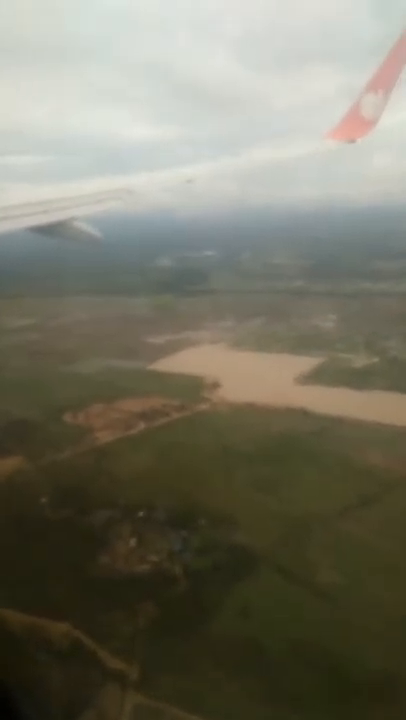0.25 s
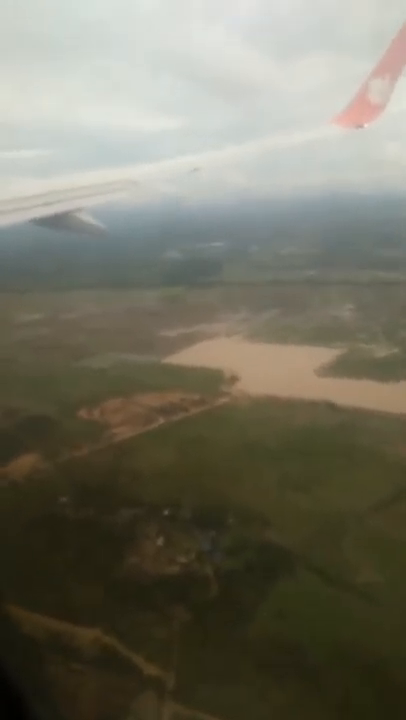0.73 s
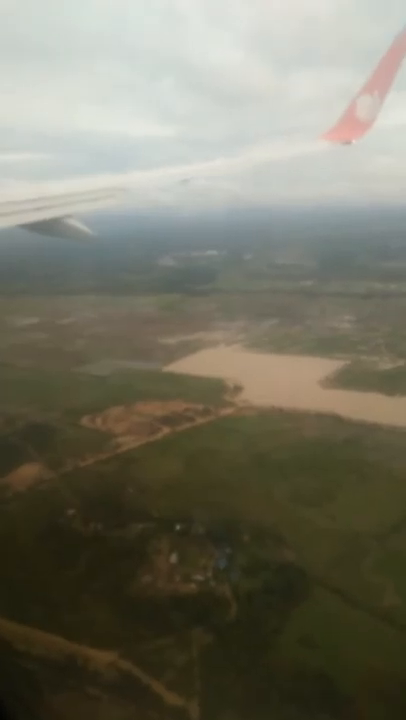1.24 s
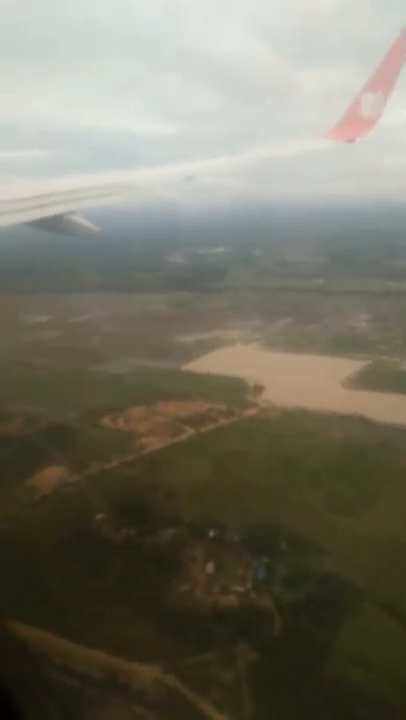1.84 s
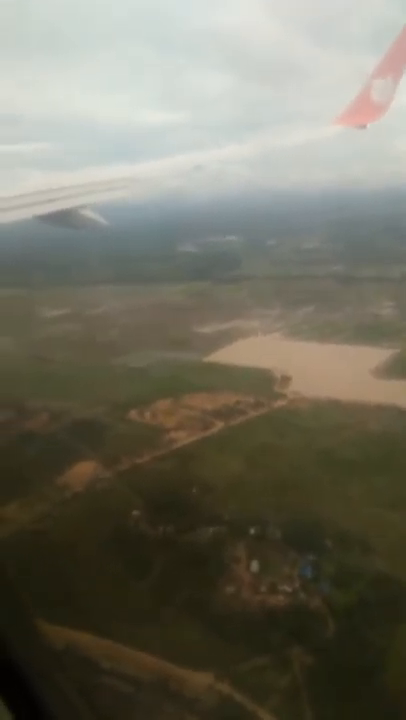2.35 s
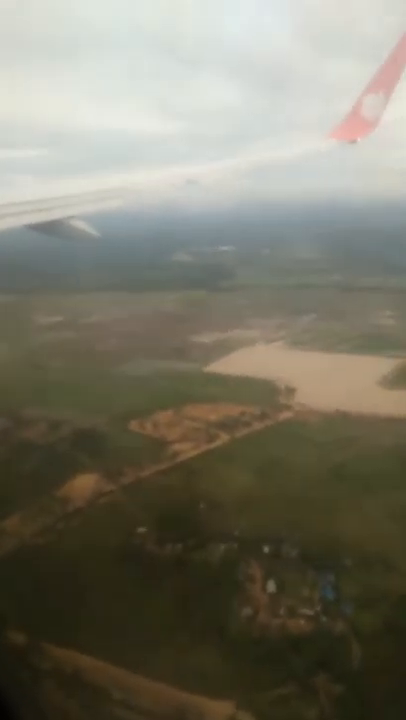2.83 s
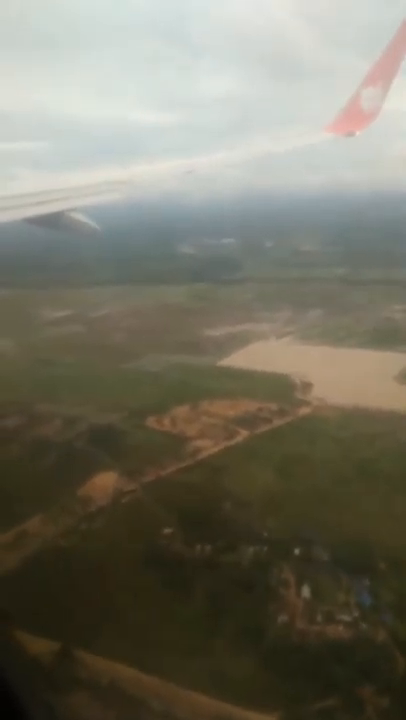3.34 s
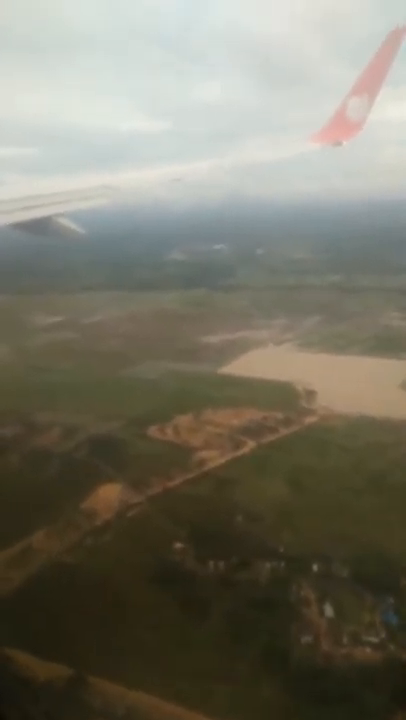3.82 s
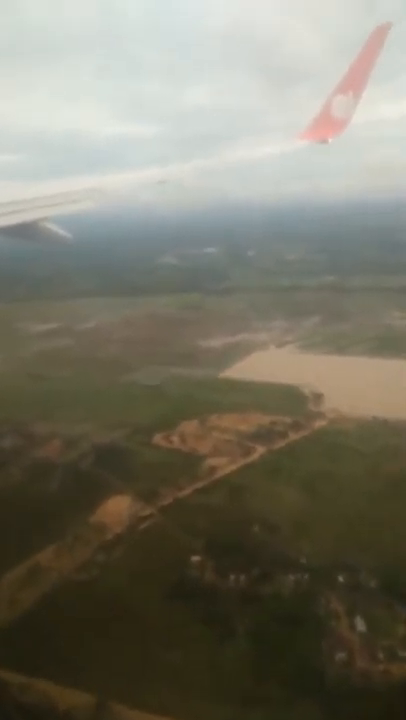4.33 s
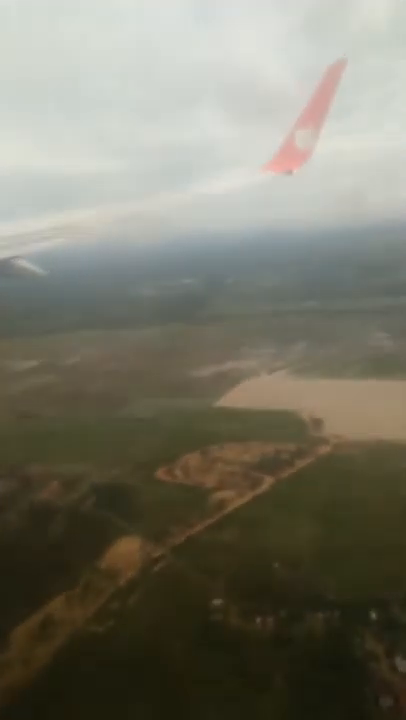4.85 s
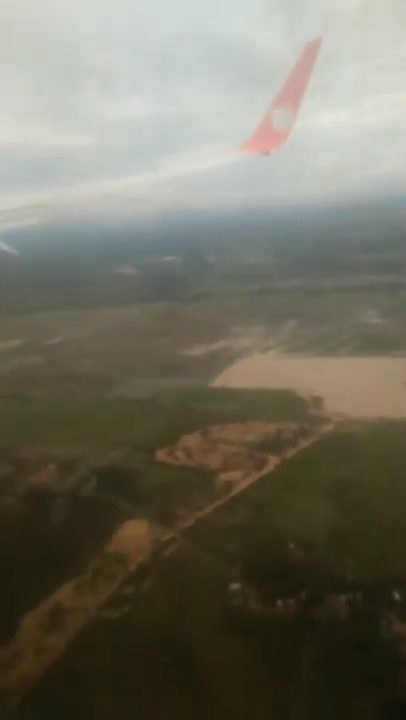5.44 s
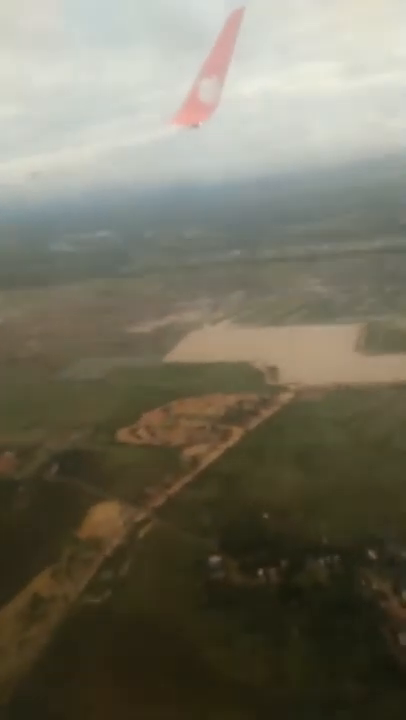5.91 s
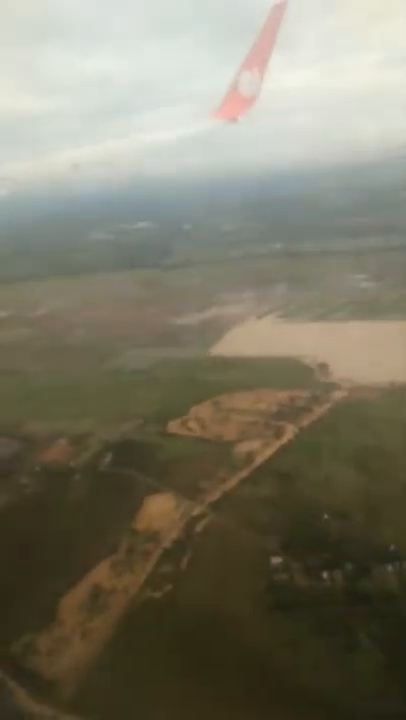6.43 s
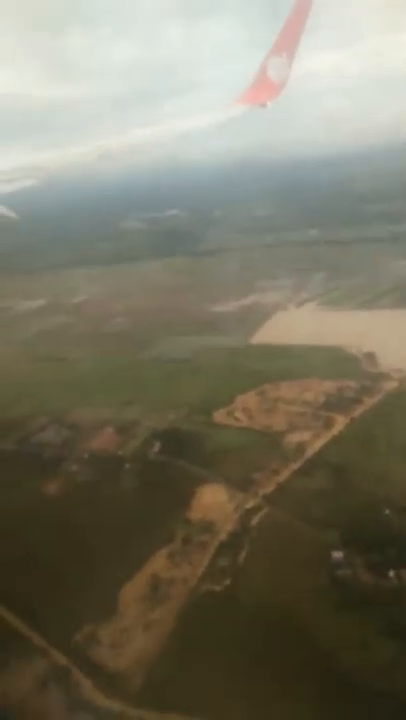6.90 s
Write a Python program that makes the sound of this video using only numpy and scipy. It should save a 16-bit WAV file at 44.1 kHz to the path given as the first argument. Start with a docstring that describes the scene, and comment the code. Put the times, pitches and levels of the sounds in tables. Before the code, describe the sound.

Heard from a window seat in a descending airliner, a deep engine and airflow rumble throbs throughout. Air rushes along the fuselage, with a faint vent hiss and a thin turbine whine above it. Cloth rustles faintly close to the microphone, with tiny ticks. From about two seconds on, loose trim knocks softly now and then. A brief hollow swell comes near six seconds, and the vents whistle slightly more afterward.

```python
"""A window seat in a descending airliner. From the start, engine and slipstream rumble throbs and surges in
the cabin's low resonances, air rushing along the fuselage makes the panels ring, vents hiss under a thin
turbine whine, and cloth rustles faintly close by. Soft scuffs and small ticks join within the first
second, dull knocks of the trim from 1.8 s on. Near 6 s comes a hollow swell; then the vents whistle more."""
import sys
import numpy as np
from scipy import signal
from scipy.fft import rfft, irfft, next_fast_len
from scipy.io import wavfile
from scipy.ndimage import uniform_filter1d, map_coordinates

SR = 44100
rng = np.random.default_rng(int(sys.argv[2]) if len(sys.argv) > 2 else 0)


def to_wav(s):
    """Save 16-bit WAV."""
    ch = np.atleast_2d(s).T  # columns
    pcm = np.round(np.clip(ch, -1, 1) * 32767)  # PCM
    wavfile.write(sys.argv[1], SR, pcm.astype(np.int16))


N = 316197


def amp(db):
    """Decibels to amplitude ratio."""
    return 10 ** (np.asarray(db) / 20)


def unit(x):
    """Normalisation to rms 1."""
    return x / np.sqrt(np.mean(x ** 2) + 1e-20)


def curve(rows):
    """Linear interpolation of (time [s], value) rows to one value per sample."""
    return np.interp(np.arange(N) / SR, *np.transpose(rows))


def swell(middle_s, half_s):
    """A Gaussian envelope of height 1, down to 1/e at half_s from its middle."""
    u = np.linspace(-4, 4, 161)
    return np.interp(np.arange(N) / SR, middle_s + half_s * u, np.exp(-u ** 2))


def wobble(rate):
    """Random modulation: a spline through rate Gaussian knots a second."""
    grid = np.arange(0, N + 16, 16)
    spline = map_coordinates(rng.standard_normal(8192), [grid * rate / SR], mode="wrap")
    return np.interp(np.arange(N), grid, spline)


def filtered(x, response):
    """Linear filtering: the spectrum of x times a frequency response."""
    size = next_fast_len(len(x) + SR // 4, real=True)
    return irfft(rfft(x, size) * response(np.fft.rfftfreq(size, 1 / SR)), size)[:len(x)]


def tint(x, spectrum):
    """Spectral shaping of x by (frequency [Hz], gain [dB]) points, at rms 1."""
    points_hz, db = np.transpose(spectrum)
    return unit(filtered(x, lambda hz: amp(np.interp(np.log(hz + 1), np.log(points_hz), db))))


def resonant(modes):
    """Random excitation of steep-sided resonances whose powers add, at rms 1."""
    def power(hz):
        return sum(amp(db) ** 2 / (1 + ((hz - centre) / width) ** 2) ** 3 for centre, width, db in modes)
    return unit(filtered(rng.standard_normal(N), lambda hz: np.sqrt(power(hz))))


def steadied(x, seconds):
    """Division by the running rms evens out slow swells and keeps the fast flutter."""
    power = np.abs(uniform_filter1d(x ** 2, int(seconds * SR)))
    return unit(x / np.sqrt(power + 1e-9))


def patchy(x, depth_db):
    """Random modulation of patches a few hundred hertz wide and a few hundredths of a second long."""
    spectra = signal.stft(x, nperseg=1024)[2]
    field = uniform_filter1d(rng.standard_normal(spectra.shape), size=5, axis=0)
    field = uniform_filter1d(field, size=5, axis=1)
    return unit(signal.istft(spectra * amp(depth_db * unit(field)), nperseg=1024)[1][:N])


def singing(hz, width_hz):
    """Narrow-band noise of a flow-driven resonance: amplitude and phase wander at random."""
    phase = 2 * np.pi * hz * np.arange(N) / SR
    return wobble(width_hz) * np.sin(phase) + wobble(width_hz) * np.cos(phase)


def grains(per_s, spread_db):
    """Shot noise: impulses at random moments, of random sign and log-normal size."""
    impulses = (rng.random(N) < per_s / SR) * np.sign(rng.standard_normal(N))
    return impulses * amp(spread_db * rng.standard_normal(N))


def rumble():
    """Forced vibration: turbulence drives hull and cabin air modes; the throb briefly swells and dips."""
    # deep modes of the fuselage: (frequency [Hz], width [Hz], relative level [dB])
    hull_modes = [(52, 13, -3), (70.6, 26.5, -7.5), (102, 36.5, -11)]
    # droning modes of the cabin air: (frequency [Hz], width [Hz], relative level [dB])
    air_modes = [(150.8, 22.8, -2), (186.4, 37, 0), (196.6, 18, -4)]
    # hollow modes above the drone: (frequency [Hz], width [Hz], relative level [dB])
    boom_modes = [(264, 34, -7), (287.2, 35.6, 1.5), (314, 53, -5.5)]
    # slow drift: (time [s], hull level [dB], drone level [dB], boom level [dB])
    levels = [(0, -34, -34, -42), (.8, -30, -33, -44), (1.4, -30, -32, -37), (2.05, -32.5, -30.5, -39),
              (2.7, -30.5, -30, -39), (3.55, -31, -31, -41), (4.35, -30.5, -32, -40),
              (5.45, -30.5, -31, -37), (6.0, -34, -33, -38), (6.7, -34, -31.5, -38.5),
              (7.17, -33, -33.5, -36.5)]
    # brief swells and dips of the rumble: (time [s], half length [s], hull gain [dB], drone gain [dB])
    rumble_swells = [(0.096, 0.021, -2, -10), (0.26, 0.018, 9, 19), (0.388, 0.034, -2, 5.5),
                     (0.592, 0.035, -4, -19), (0.703, .04, -2.5, 1), (1.045, 0.031, 3, -12),
                     (1.226, 0.013, 2.5, -6.5), (1.306, .02, -2.5, -13), (1.359, .022, 5, 5.5),
                     (1.476, 0.019, -6, -5), (1.59, 0.062, 3.5, 3.5), (1.739, 0.019, -6, -10),
                     (1.933, .03, 10, -7), (2.053, 0.022, 7, 3.5), (2.215, .025, 4, 1.5),
                     (2.26, 0.025, 5.5, 0), (2.358, .035, -5.5, -7), (2.652, 0.024, 1, 1),
                     (2.695, 0.021, 2, 6.5), (2.769, 0.024, 5.5, 2.5), (2.924, .03, 8, -11),
                     (3.016, 0.062, -2.5, -5.5), (3.133, 0.017, -1, 8), (3.258, 0.023, 7, 6),
                     (3.345, 0.017, 2, 5.5), (3.459, 0.058, -4, 7), (3.568, .035, -5.5, 0),
                     (3.691, 0.026, -1.5, 3.5), (3.761, .03, -0.5, 5.5), (3.89, 0.04, 5, -1.5),
                     (3.989, .03, -10.5, 7.5), (4.305, 0.038, 4.5, -3), (4.428, 0.023, 3, 4.5),
                     (4.521, 0.028, 1, 10), (4.569, 0.025, 5, 4.5), (4.66, .035, 5.5, 0),
                     (4.809, 0.016, -9, 7.5), (4.983, .04, 3, 3.5), (5.168, 0.034, 5.5, 3),
                     (5.228, 0.036, -6.5, -9), (5.411, .04, 3, -9), (5.81, 0.038, 12.5, -0.5),
                     (5.959, 0.031, 4.5, 8.5), (6.02, .03, -5, -1), (6.258, 0.046, 1, 10.5),
                     (6.317, 0.027, 8.5, -5), (6.454, 0.028, 9, -4), (6.603, 0.036, 2, 4.5),
                     (6.679, 0.049, 8.5, 0), (6.796, 0.015, -9, 12)]
    hull_db, drone_db, boom_db = (curve(np.array(levels)[:, [0, k]]) for k in range(1, 4))
    hull_lift = sum(db * swell(s, half) for s, half, db, _ in rumble_swells)
    air_lift = sum(db * swell(s, half) for s, half, _, db in rumble_swells)
    hull = amp(hull_db + hull_lift + 1.5 * wobble(13)) * steadied(resonant(hull_modes), seconds=.08)
    drone = amp(drone_db + air_lift + 1.9 * wobble(17)) * steadied(resonant(air_modes), seconds=.06)
    boom = amp(boom_db + .3 * air_lift + 2.4 * wobble(13)) * steadied(resonant(boom_modes), seconds=.2)
    return hull + drone + boom


def panel_roar():
    """Plate resonance: the slipstream drives wall and window panels; now and then one rings out."""
    # wall panel modes: (frequency [Hz], width [Hz], relative level [dB])
    wall_modes = [(400.4, 44, 4), (475.2, 34, -2.5), (548, 35, -10)]
    # roar in the walls: (time [s], level [dB])
    wall_levels = [(0, -46), (.38, -48), (.52, -43), (1.1, -42), (1.75, -47), (2.2, -45.5), (2.36, -43.5),
                   (2.5, -47), (2.68, -43), (3.05, -49), (3.38, -48), (3.48, -43.5), (3.9, -48.5),
                   (4.5, -44), (5.0, -46), (5.15, -44), (6.05, -41), (6.4, -42.5), (7.17, -45)]
    # window panel modes: (frequency [Hz], width [Hz], relative level [dB])
    window_modes = [(597.3, 47, -3), (722.5, 49, -3), (808, 68, -3.5), (890, 42, -3), (984, 121, -8)]
    # roar in the windows: (time [s], level [dB])
    window_levels = [(0, -48.5), (.42, -49), (.51, -43.5), (.62, -48), (.85, -45.5), (1.05, -46.5),
                     (1.15, -44.5), (1.57, -43.5), (1.78, -49), (1.92, -47), (2.4, -48), (2.7, -50),
                     (2.82, -45), (3.08, -49), (3.22, -45), (3.42, -49.5), (3.6, -45), (4.2, -46),
                     (4.42, -46.5), (4.7, -45.5), (5.6, -45), (6.2, -45.5), (7.17, -46)]
    # brief rings of a panel: (time [s], frequency [Hz], level [dB])
    rings = [(.53, 735, -47), (.68, 790, -43.5), (1.14, 860, -43.5), (1.35, 754, -50), (1.43, 711, -50),
             (1.5, 830, -50), (1.57, 807, -48), (1.64, 592, -44.5), (2.80, 730, -46), (2.86, 790, -50),
             (3.14, 1615, -58), (3.54, 1012, -45), (3.88, 894, -43), (4.01, 743, -45), (4.18, 721, -42.5),
             (6.70, 894, -44), (6.89, 900, -44)]
    walls = amp(curve(wall_levels) + 1.7 * wobble(20)) * steadied(resonant(wall_modes), seconds=.11)
    window_gain = amp(curve(window_levels) + .84 * wobble(44))
    windows = window_gain * steadied(patchy(resonant(window_modes), depth_db=2.2), seconds=.09)
    ringing = sum(amp(db) * swell(s, half_s=.03) * singing(hz, width_hz=55) for s, hz, db in rings)
    return walls + windows + ringing


def wall_reflections(x):
    """Destructive interference: reflections from the near walls cancel narrow bands."""
    # cancelled bands: (frequency [Hz], width [Hz], gain at the centre [dB])
    nulls = [(235.4, 9.3, -6), (372.2, 37.2, -19.5)]
    def response(hz):
        notches = [np.hypot(hz - centre, width * amp(db)) / np.hypot(hz - centre, width)
                   for centre, width, db in nulls]
        return np.prod(notches, axis=0)
    return filtered(x, response)


def air_rush():
    """Boundary-layer noise: eddies rush along the skin of the fuselage; the treble slowly opens up."""
    # spectrum of the rush: (frequency [Hz], relative spectral level [dB])
    spectrum = [(400, -25), (900, -20), (1130, 4), (1420, 1.5), (1550, -1.5), (1750, 0.5), (1930, -6),
                (2380, -5.5), (2520, -11), (2620, -7.5), (2760, -8.5), (3100, -15.5), (3450, -14),
                (3580, -17), (3870, -18.5), (4200, -22.5), (4950, -22.5), (5250, -19.5), (5800, -22),
                (14000, -44.5)]
    # lift of the treble: (time [s], gain [dB])
    treble_lift = [(0, 0), (2.2, 0), (2.7, 2.5), (4.3, 1.7), (5.4, 0.5), (6.3, 3), (7.17, 3.5)]
    treble_from_hz, start_db, growth_db_per_s = 1940, -58, .08
    air = tint(rng.standard_normal(N), spectrum)
    treble = filtered(air, lambda hz: 1 - 1 / (1 + (hz / treble_from_hz) ** 16))
    body = air - treble
    low_eddies = body.std() * patchy(body, depth_db=3.0)
    high_eddies = amp(curve(treble_lift)) * treble.std() * patchy(treble, depth_db=2.5)
    level_db = start_db + growth_db_per_s * np.arange(N) / SR + .25 * wobble(46)
    return amp(level_db) * (low_eddies + high_eddies)


def vents():
    """Flow-excited resonance: air hisses through the vents and whistles in short flurries."""
    # vent resonances: (frequency [Hz], width [Hz], relative level [dB])
    modes = [(2054, 140, 5.5), (2200, 61, 7)]
    # vent hiss: (time [s], level [dB])
    levels = [(0, -69), (1.3, -64), (2.5, -67), (3.5, -64), (4.5, -63.5), (5.2, -67), (5.8, -66),
              (6.1, -59.5), (7.17, -65)]
    # whistling flurries: (time [s], half length [s], frequency [Hz], level [dB])
    flurries = [(0.457, 0.069, 2030, -60.5), (0.722, .05, 2100, -63), (1.13, 0.032, 2196, -57),
                (1.236, .025, 1873, -57), (1.347, 0.032, 1930, -61), (2.87, 0.026, 2229, -57),
                (3.49, .04, 2170, -59), (3.615, 0.034, 2207, -58.5), (4.782, .04, 2055, -61),
                (5.418, 0.02, 2210, -57), (6.06, .04, 2120, -62), (6.18, 0.046, 2160, -58),
                (6.48, 0.033, 2089, -54.5), (6.52, .025, 1873, -60), (6.72, .035, 2090, -59),
                (7.044, 0.023, 2060, -53.5), (7.106, 0.016, 2078, -50)]
    hiss = amp(curve(levels) + 2.0 * wobble(40)) * steadied(resonant(modes), seconds=.1)
    whistles = sum(amp(db) * swell(s, half) * singing(hz, width_hz=90) for s, half, hz, db in flurries)
    return hiss + whistles


def turbine_whine():
    """A harmonic series creeps up with engine speed; each partial wavers on its way through the hull."""
    # overall whine: (time [s], level [dB])
    levels = [(0, -64), (.8, -63.5), (1.6, -65), (2.45, -64), (2.7, -66), (3.15, -61.5), (3.55, -64),
              (3.85, -61.5), (4.8, -61.5), (5.4, -67), (5.9, -65.5), (6.15, -69.5), (6.35, -64),
              (7.17, -70)]
    # partials of the turbine tone: (harmonic number, relative level [dB])
    harmonics = [(1, -5.5), (2, -8), (3, -21.5), (4, -34)]
    start_hz, spool_hz_per_s = 1207.9, .15
    hz = start_hz + spool_hz_per_s * np.arange(N) / SR + .3 * wobble(9)
    phase = 2 * np.pi * np.cumsum(hz) / SR
    tones = sum(amp(db + 2.9 * wobble(13)) * np.sin(round(k) * phase) for k, db in harmonics)
    return np.sqrt(2) * amp(curve(levels)) * tones


def cloth_rustle():
    """Friction noise: rubbing fibres hiss and snap, each rub adding its power to a faint steady rustle."""
    # hiss of the fibres: (frequency [Hz], relative spectral level [dB])
    hiss_spectrum = [(3000, -34.5), (5600, -20.5), (6650, -6), (6950, -7), (7350, 0), (8250, -2.5),
                     (8600, -7.5), (8900, -7), (9300, -12), (10000, -17.5), (10400, -17), (11000, -23),
                     (14000, -32)]
    # snaps of the fibres: (frequency [Hz], relative spectral level [dB])
    snap_spectrum = [(3000, -34), (6300, -18.5), (7400, 3.5), (8400, -2), (9500, -12), (11000, -21.5),
                     (14000, -24.5)]
    # rubs of the cloth: (start time [s], end time [s], level [dB])
    rubs = [(0.202, .32, -70.5), (.41, 0.458, -72.5), (0.566, 0.622, -69), (0.76, 0.793, -70.5),
            (.9, 1.01, -68), (1.274, 1.364, -65.5), (1.513, 1.583, -67.5), (1.68, 1.76, -71.5),
            (1.81, 1.84, -75), (1.95, 2.094, -71), (2.327, 2.42, -70), (2.47, 2.67, -70.5),
            (2.73, 2.962, -68), (3.07, 3.103, -76), (3.23, 3.263, -68), (3.36, 3.42, -73.5),
            (3.543, 3.795, -76), (3.928, 4.095, -72.5), (4.15, 4.38, -72.5), (4.51, 4.57, -66),
            (4.632, 4.73, -69.5), (4.773, 4.82, -66), (4.87, 4.94, -67), (4.984, 5.102, -65.5),
            (5.144, 5.205, -67), (5.243, 5.4, -65), (5.46, 5.52, -72.5), (5.62, 5.66, -69.5),
            (5.73, 5.85, -70), (5.96, 6.15, -82), (6.34, 6.39, -71.5), (6.49, 6.647, -67.5),
            (6.776, 6.87, -69.5), (6.92, 7.17, -67)]
    # brief dips of the rustle: (time [s], half length [s], gain [dB])
    dips = [(0.115, 0.055, -4.5), (3.483, 0.027, -3), (6.247, 0.04, -7)]
    attack_s, release_s, rest_db, snap_over_hiss_db = .03, .04, -71, -8
    t = np.arange(N) / SR
    hold = lambda s, end: np.interp(t, [s - attack_s, s, end, end + release_s], [0, 1, 1, 0])
    power = amp(rest_db) ** 2 + sum(amp(db) ** 2 * hold(s, end) for s, end, db in rubs)
    flutter = amp(.6 * wobble(260) + 1.1 * wobble(45))
    hiss = patchy(tint(rng.standard_normal(N), hiss_spectrum), depth_db=1.3)
    snaps = amp(snap_over_hiss_db) * tint(grains(per_s=420, spread_db=4.5), snap_spectrum)
    dip_db = sum(db * swell(s, half) for s, half, db in dips)
    return np.sqrt(power) * amp(dip_db) * unit(flutter * (hiss + snaps))


def scuffs():
    """Band-limited noise under Gaussian envelopes: soft scuffs and, last, one low hollow swell."""
    # noise swells: (time [s], half length [s], frequency [Hz], width [Hz], level [dB])
    swells = [(.25, .04, 4740, 900, -74), (1.303, 0.042, 6300, 620, -68), (1.96, 0.023, 3800, 1500, -70),
              (3.153, 0.065, 2430, 470, -61), (4.495, .011, 4900, 800, -67),
              (5.007, 0.087, 1230, 310, -53.5), (5.996, 0.051, 268, 9.5, -29.5)]
    return sum(amp(db) * swell(s, half) * resonant([(hz, width, 0)]) for s, half, hz, width, db in swells)


def ticks():
    """Transients of tiny catches: clusters of grains that decay exponentially, topped by a crackle."""
    # catches: (time [s], body level [dB], 60 dB decay time [s], crackle level [dB])
    catches = [(.59, -70, 0.17, -88), (1.51, -60, .18, -71.5), (2.41, -68.5, .26, -88),
               (2.763, -67, .15, -70.5), (2.803, -79, .1, -81), (4.493, -62.5, .15, -93),
               (6.495, -62, .09, -89), (6.948, -66.5, 0.15, -78), (6.997, -69, .091, -83),
               (7.043, -57.5, .22, -79)]
    # body of a tick: (frequency [Hz], relative spectral level [dB])
    spectrum = [(3500, -30), (5500, -16), (7900, 5), (10000, -8), (14000, -23.5)]
    rise_s, crackle_hz, crackle_width_hz = .005, 13200, 3000
    t = np.arange(N) / SR
    decay = lambda s, t60: amp(-60 * np.minimum(np.abs(t - s) / t60, 2))
    envelopes = np.array([np.where(t < s, swell(s, rise_s), decay(s, t60)) for s, _, t60, _ in catches])
    _, body_db, _, crackle_db = np.transpose(catches)
    body = patchy(tint(grains(per_s=2500, spread_db=1.5), spectrum), depth_db=2.0)
    crackle = unit(amp(6 * wobble(900)) * resonant([(crackle_hz, crackle_width_hz, 0)]))
    return (amp(body_db) @ envelopes) * body + (amp(crackle_db) @ envelopes) * crackle


def trim_knocks():
    """Damped resonance: loose trim bumps softly, with a quick rise and a dull exponential decay."""
    # bumps: (time [s], 60 dB decay time [s], frequency [Hz], width [Hz], level [dB])
    bumps = [(1.824, 0.083, 920, 280, -45), (1.845, 0.21, 950, 270, -39.5), (3.168, 0.15, 860, 320, -47),
             (3.529, 0.2, 1000, 170, -48), (3.884, 0.23, 1030, 230, -41.5), (4.481, 0.16, 1080, 200, -47),
             (4.585, 0.35, 1200, 300, -51), (5.151, 0.39, 1350, 260, -46.5), (6.68, 0.34, 900, 298, -52),
             (7.063, .2, 1060, 259, -50)]
    attack_s = .005
    t = np.arange(N) / SR
    rise = lambda s: np.clip((t - s) / attack_s + 1, 0, 1)
    decay = lambda s, t60: amp(-60 * np.clip((t - s) / t60, 0, 2))
    return sum(amp(db) * rise(s) * decay(s, t60) * resonant([(hz, width, 0)])
               for s, t60, hz, width, db in bumps)


def scene():
    """Superposition of all the sources at the seat, in one channel."""
    cabin = wall_reflections(rumble() + panel_roar()) + air_rush() + vents() + turbine_whine()
    return (cabin + cloth_rustle() + ticks() + scuffs() + trim_knocks())[None]


def record(dry):
    """Band-pass response: the microphone sheds the lowest bass and keeps nothing above its band limit."""
    low_cut_hz, top_hz = 39, 14250
    return filtered(dry[0], lambda hz: (hz < top_hz) / np.sqrt(1 + (low_cut_hz / (hz + 1)) ** 10))[None]


dry = scene()
out = record(dry)
to_wav(out)
```